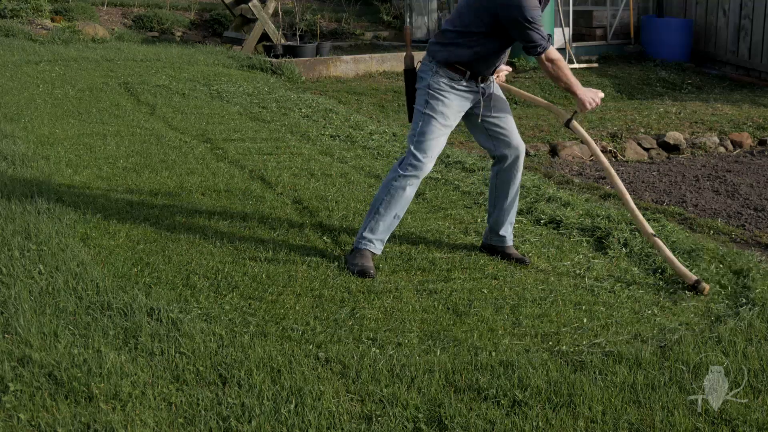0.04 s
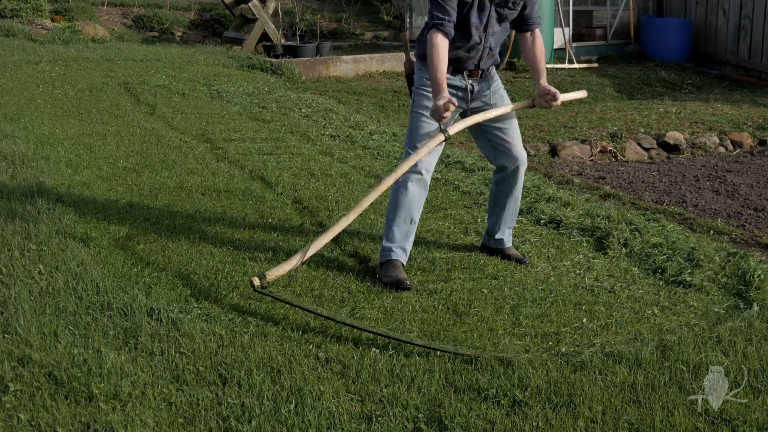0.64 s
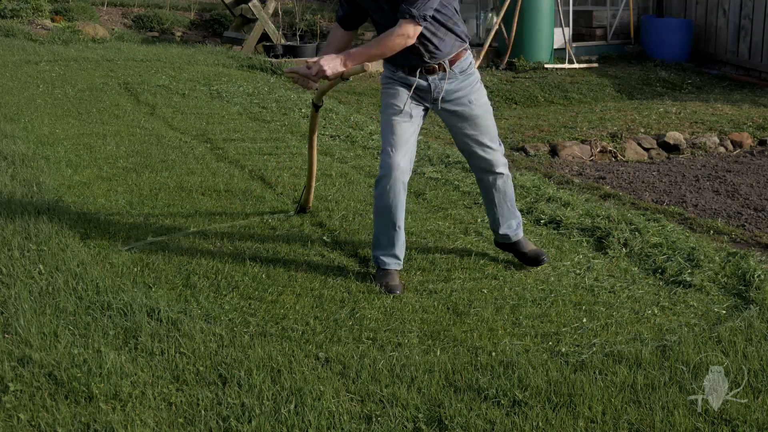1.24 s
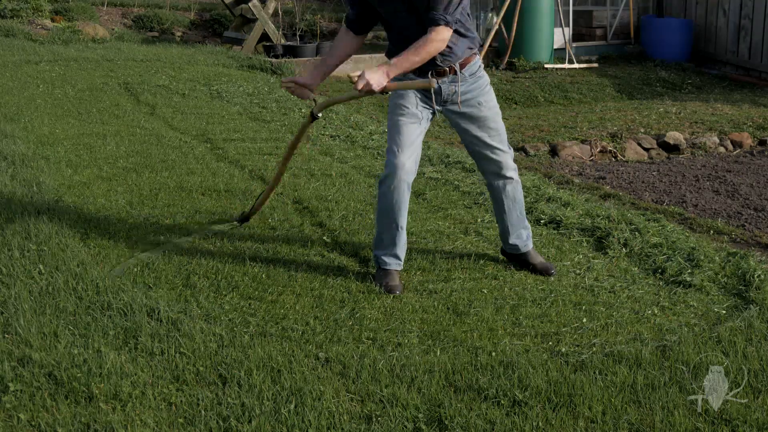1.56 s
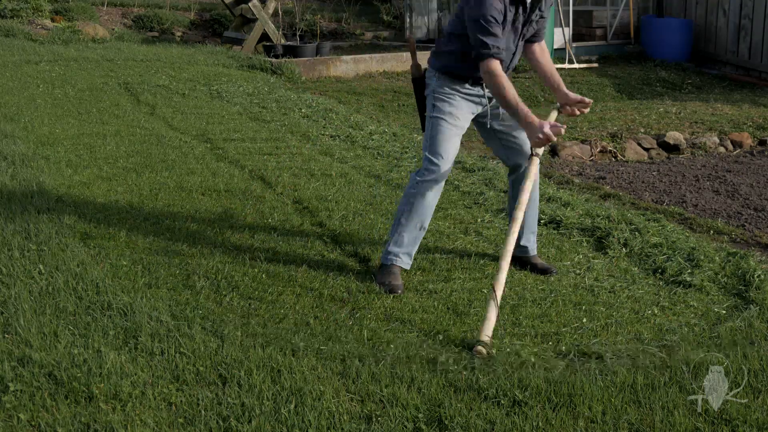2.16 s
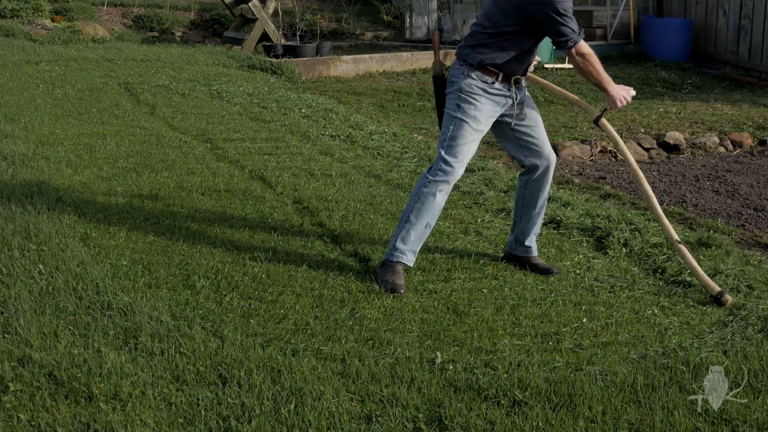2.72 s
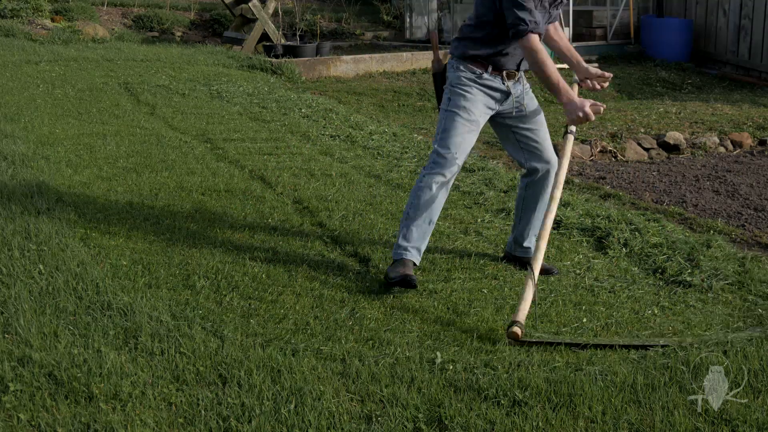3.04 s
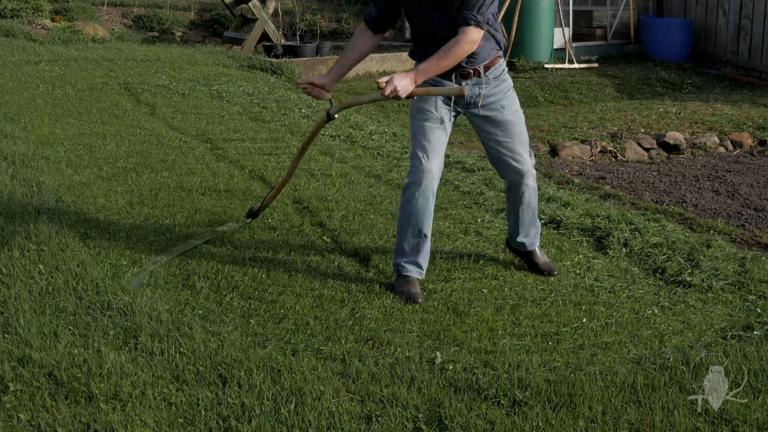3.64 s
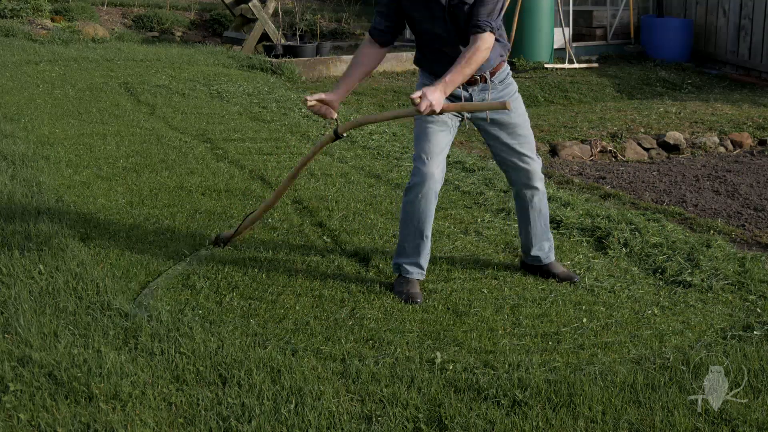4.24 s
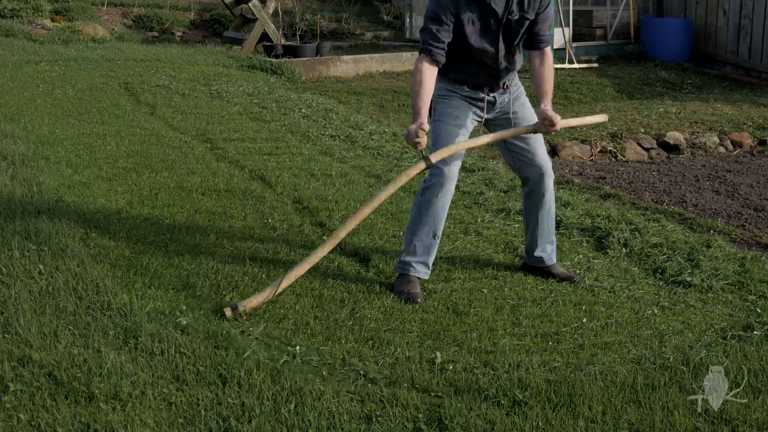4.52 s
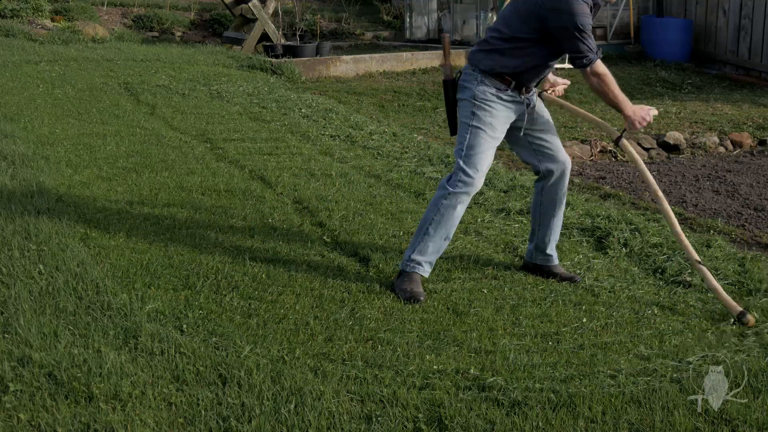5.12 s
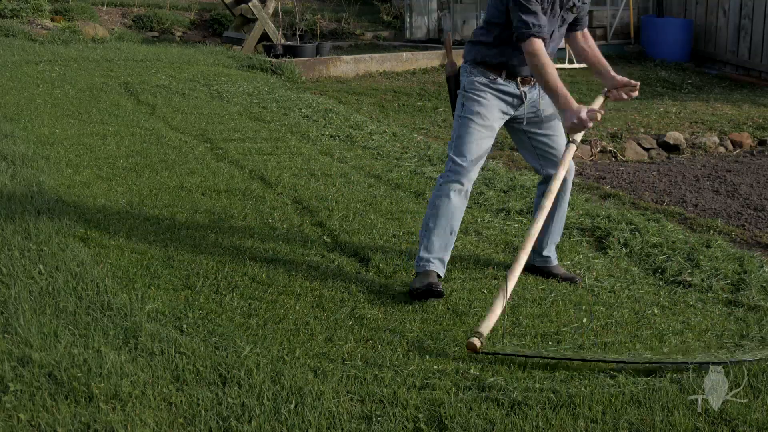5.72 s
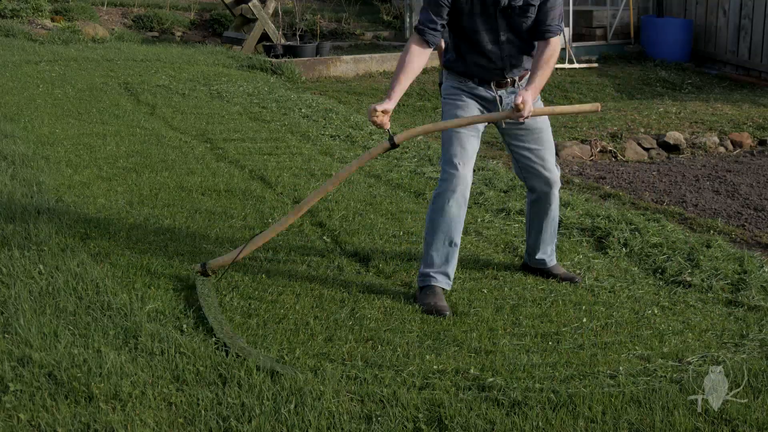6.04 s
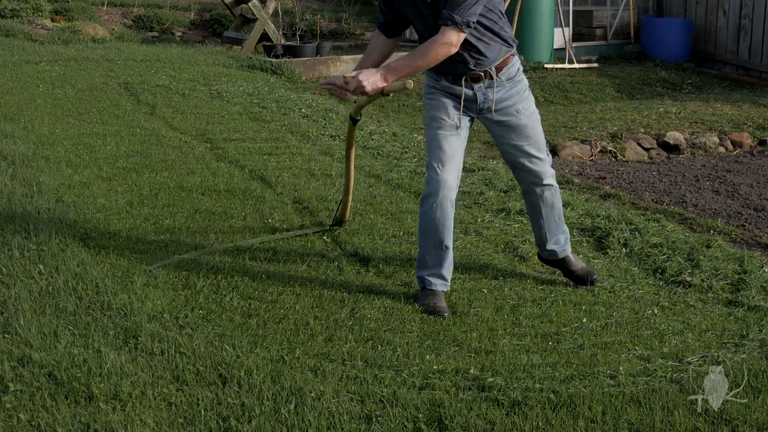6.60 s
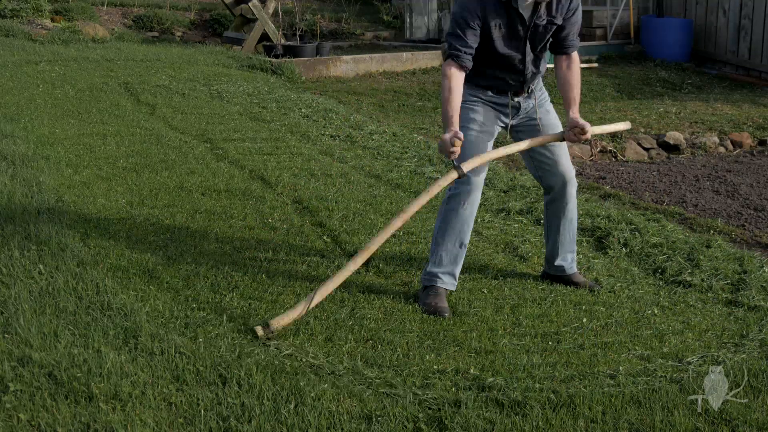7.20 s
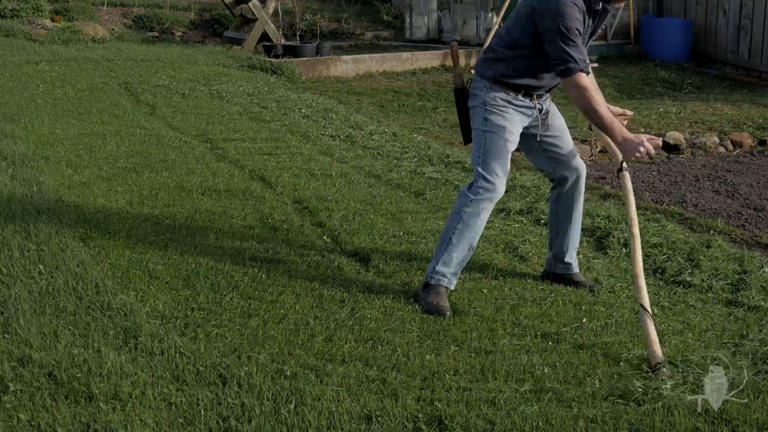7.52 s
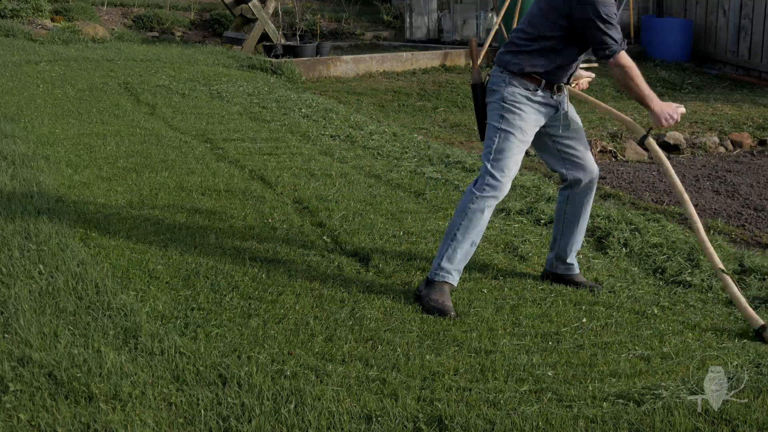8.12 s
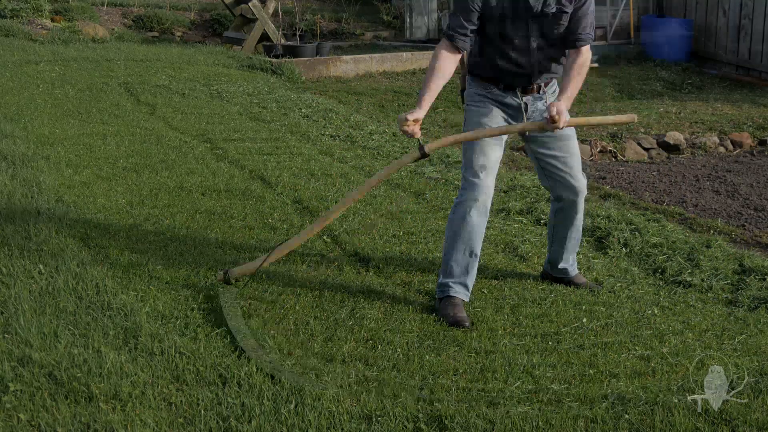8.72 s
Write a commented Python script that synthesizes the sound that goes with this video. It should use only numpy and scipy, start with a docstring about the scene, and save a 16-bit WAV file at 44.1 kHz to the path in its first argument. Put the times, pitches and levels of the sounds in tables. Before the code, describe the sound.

A scythe stroke fades out, then the thin steel blade mows three long strokes through grass, about two and a half seconds apart. Each swells into a crisp, faintly metallic swish and ends with a short scrape on the turf. Between them the blade skims softly back and boots shift faintly. The mowing is close, in a quiet garden with small birds chipping and whistling over a low hum of distant traffic.

```python
"""A scythe stroke dies away as small birds chip and whistle over a low hum of distant traffic.
The blade skims back over the stubble, then mows three long strokes, near 2.3, 4.8 and 7.5 seconds.
In each, the edge snaps thousands of stems, whose impulses excite the modes of the thin steel;
as the swing ends the blade's back scrapes the turf, and then it skims back again.
The birds and the traffic carry on to the end."""
import sys
import numpy as np
from scipy import signal
from scipy.fft import rfft, irfft
from scipy.io import wavfile
from scipy.ndimage import map_coordinates

SR = 44100
rng = np.random.default_rng(int(sys.argv[2]) if len(sys.argv) > 2 else 0)


def transcribe(signal):
    """Save signal, clipped to [-1, 1], as a 16-bit WAV file at the path in sys.argv[1]."""
    frames = np.atleast_2d(signal).T
    limited = np.clip(frames, -1, 1)
    pcm = np.round(limited * 32767).astype(np.int16)
    wavfile.write(sys.argv[1], SR, pcm)


N = 386316
TIME = np.arange(N) / SR
HZ = np.maximum(np.arange(N // 2 + 1) * SR / N, 1)


# Spectrum of grass swept aside: frequency_hz, gain_db
SWEEP_SPECTRUM = [(240, -13.5), (330, -4), (420, -2), (560, 0), (720, -3), (1080, -7), (1200, -11.5)]
# Spectrum of the blade's back scraping the turf: frequency_hz, gain_db
SCRAPE_SPECTRUM = [(700, -0.5), (1100, 4.5), (1350, -5.5), (1750, 1.5), (2200, -3), (2750, -9), (3800, -9),
                   (4400, -7.5), (5900, -6.5), (7500, -12)]
# Spectrum of the edge biting the stems: frequency_hz, gain_db
BITE_SPECTRUM = [(1600, 0.5), (1800, 0), (2700, 0.5), (3400, 1.5), (4300, 7), (5400, 1), (6500, -5.5),
                 (8000, -19.5)]
# Spectrum of the stems crackling: frequency_hz, gain_db
CRACKLE_SPECTRUM = [(7000, -3), (8000, -7), (9300, -6.5), (10500, -3), (12000, -2.5), (14000, -0.5),
                    (15100, -1.5), (15800, -4)]

def mowing():
    """Source and filter: trains of snaps are shaped into sweep, scrape, bite and crackle."""
    sweep, scrape, bite, crackle = swings()
    stems = snaps(per_s=15000, spread_db=2.0, clump_db=1.0)
    turf = snaps(per_s=8000, spread_db=3.0, clump_db=0.9)
    leaves = snaps(per_s=6000, spread_db=2.0, clump_db=-0.1)
    out = sweep * coloured(leaves, SWEEP_SPECTRUM)
    pressure = from_db(0.92 * drift(19.0))  # bumps in the lawn make the back press unevenly
    out += scrape * pressure * coloured(blade(turf, rubbed=True), SCRAPE_SPECTRUM)
    out += bite * ground_reflection(coloured(blade(stems, rubbed=False), BITE_SPECTRUM))
    # the stems' bright crackle, with a fixed dip near 8-9 kHz
    out += crackle * coloured(stems, CRACKLE_SPECTRUM)
    return out * from_db(0.73 * drift(12.0))


def snaps(per_s, spread_db, clump_db):
    """Shot noise: stems give way at random, unequal in size and bunched in tufts."""
    breaks = rng.random(N) < per_s / SR
    sizes = from_db(spread_db * np.minimum(rng.exponential(1, N), 4))
    signs = rng.choice([-1, 1], N)
    tufts = from_db(clump_db * drift(47))
    return rms_one(breaks * sizes * signs * tufts)


# Modes of the steel blade: frequency_hz, bandwidth_hz, cutting_gain_db, rubbing_gain_db
BLADE_MODES = [(1430, 70, 6, 9.5), (1665, 70, -8, -7), (1810, 60, -1, -14), (2035, 58, 2, -13),
               (2325, 55, 1, -10), (2550, 50, 0, -12), (2855, 45, -1, -14), (3068, 52, 3, -7),
               (3285, 85, 3, -7), (3520, 50, -4, -10), (3850, 110, -12, -6), (5200, 70, -6, -15),
               (6940, 50, -6, -12)]

def blade(x, rubbed):
    """Modal resonance of thin steel: the edge excites the high modes, the back mainly the lowest."""
    response = 1
    for hz, width_hz, cut_db, rub_db in BLADE_MODES:
        detuning = (HZ ** 2 - hz ** 2) / (HZ * width_hz)
        response = response + from_db(rub_db if rubbed else cut_db) / (1 + 1j * detuning)
    return irfft(rfft(x) * response, N)


# Cutting strokes: enter_s, end_s, force_db, extra_scrape_db, extra_crackle_db, abruptness_ratio
STROKES = [(-0.47, -0.105, -3.5, 1.5, -0.5, 1.0), (2.253, 2.465, -1.5, -0.7, 0.5, 0.74),
           (4.81, 5.128, 0, 1.5, 0.2, 0.91), (7.463, 7.769, 0.08, -0.5, 0.5, 1)]
# Envelope of each part of a cut: base_db, rise_db_per_s, fall_db_per_s
SWEEP_SWELL, SCRAPE_SWELL = (-38, 31.6, 60), (-30, 115, 79.5)
BITE_SWELL, CRACKLE_SWELL = (-31, 85, 55), (-36, 103, 103)

def cutting_power(swath_gathers_s=0.087, bite_eases_s=0.12, back_presses_s=0.045):
    """Power envelopes of the cuts: the swath gathers, the edge runs out of grass, the back presses."""
    power = np.zeros((4, N))
    for enter, end, force_db, scrape_db, crackle_db, abruptness in STROKES:
        parts = [(enter + swath_gathers_s, end, 0, 1, SWEEP_SWELL),
                 (end - back_presses_s, end, scrape_db, 1, SCRAPE_SWELL),
                 (enter, end - bite_eases_s, 0, abruptness, BITE_SWELL),
                 (enter, end, crackle_db, np.sqrt(abruptness), CRACKLE_SWELL)]
        for k, (full_from, full_to, extra_db, rise_ratio, (db, rise, fall)) in enumerate(parts):
            envelope = swell(full_from, full_to, rise_ratio * rise, fall)
            power[k] += (from_db(db + force_db + extra_db) * envelope) ** 2
    return power


# Back swings over the stubble: start_s, end_s, hiss_db, touchdown_db
BACK_SWINGS = [(0.437, 0.503, -49.5, -43), (2.98, 3.176, -47.5, -40.5), (5.59, 5.693, -50.5, -46.5),
               (8.334, 8.572, -45, -41.5)]
# The blade brushing the grass as it is lifted and turned: start_s, end_s, level_db
TURNS = [(0.755, 0.78, -66), (1.045, 1.188, -62.5), (3.627, 3.738, -60), (5.79, 5.808, -60),
         (6.247, 6.387, -61.5)]
# Light contacts: rise_db_per_s, fall_db_per_s, [sweep_db, scrape_db, bite_db, crackle_db]
RUN_UP, SHED = (36.6, 92, [-52.5, -54, -47.5, -50.5]), (37, 110, [-58, -40.5, -64, -46.5])
SKIM, BRUSH = (53, 80, [-5.5, -13, 0, 0.5]), (90, 59, [-2.5, -4.5, 4, 3])

def swings(run_up_s=0.33, shed_after_s=0.15, still_after_s=0.29, still_width_s=0.034, still_db=-3.5):
    """Incoherent sources add in power: all contacts sum to gains of sweep, scrape, bite and crackle."""
    power = cutting_power()
    still = np.zeros(N)
    for enter, end, *_ in STROKES:
        power += contact_power(enter - run_up_s, enter, RUN_UP)
        power += contact_power(end + shed_after_s, end + shed_after_s, SHED)
        # at the far end of the swing the blade stands still for a moment
        still += np.exp(-((TIME - end - still_after_s) / still_width_s) ** 2)
    for start, end, hiss_db, touchdown_db in BACK_SWINGS:
        power += contact_power(start, end, SKIM, hiss_db)
        touchdown = from_db(touchdown_db) * swell(start, start, rise_db_per_s=58, fall_db_per_s=91)
        power[1] += touchdown ** 2  # scrape only
    for start, end, db in TURNS:
        power += contact_power(start, end, BRUSH, db)
    return np.sqrt(power) * from_db(still_db * still)


def contact_power(start, end, kind, db=0):
    """Light friction on grass: sweep, scrape, bite and crackle share one power envelope."""
    rise, fall, mix_db = kind
    return (from_db(db) * from_db(mix_db)[:, None] * swell(start, end, rise, fall)) ** 2


def ground_reflection(x, echo_db=-8, notch_hz=1423, climb_hz=400, lead_s=0.029, rise_s=0.18, fall_s=0.37):
    """Comb filtering: the lawn's echo notches a pitch and its odd multiples, climbing with the swing."""
    swung = sum(np.interp(TIME - end + lead_s, [-rise_s, 0, fall_s], [0, 1, 0]) for _, end, *_ in STROKES)
    half_period = SR / (2 * (notch_hz + climb_hz * swung))
    echo = map_coordinates(x, [np.arange(N) - half_period], order=3)
    return rms_one(x + from_db(echo_db) * echo)


# Tough stalks and grit hitting the blade: start_s, level_db
GRIT_HITS = [(0.4294, -51), (0.771, -53), (3.0174, -49), (5.0304, -40), (7.886, -33.5), (8.3424, -48)]

def ticks():
    """Impact excitation: small hard hits set the blade's modes ringing."""
    spectrum_hz_db = [(700, -1), (1500, 2), (4000, 6), (12000, -43)]
    return blade(knocks(GRIT_HITS, spectrum_hz_db, decay_s=0.0089), rubbed=True)


# Boots shifting on the lawn: start_s, level_db
FOOTFALLS = [(0.768, -47), (1.498, -44), (4.107, -41), (5.969, -45), (6.79, -46)]

def steps():
    """Damped impact: boots on soft turf give short, low crunches."""
    spectrum_hz_db = [(250, -3), (500, 5), (1000, -8)]
    return knocks(FOOTFALLS, spectrum_hz_db, decay_s=0.029)


def knocks(hits, spectrum, decay_s):
    """Exponential decay: each contact is a burst of noise that starts fast and dies away."""
    envelope = np.zeros(N)
    for start, db in hits:
        age = np.maximum(TIME - start, 0) / decay_s
        envelope += from_db(db) * np.minimum(age * 10, 1) * np.exp(-age)
    return envelope * coloured(rng.standard_normal(N), spectrum)


def birds():
    """Distance raises the share of scattered sound: chips are near, calls and chatter farther off."""
    near = garden(chips(), t60_s=0.068, scatter_db=-7.5)
    far = garden(calls(), t60_s=0.8, scatter_db=-4.5)
    among_trees = garden(chatter(), t60_s=0.28, scatter_db=-3)
    return near + far + among_trees


# A small bird's runs of chips: first_s, last_s, chip_count, first_db, last_db
CHIP_SERIES = [(0.023, 0.173, 3, -43.5, -41.5), (0.226, 0.29, 2, -43, -47), (1.164, 1.36, 2, -52, -49.5),
               (1.487, 1.564, 2, -39.5, -39.5), (1.793, 2.053, 5, -43, -40), (2.566, 2.639, 2, -39, -38),
               (2.734, 2.999, 4, -41.5, -43), (3.363, 3.557, 4, -50.5, -57), (3.615, 3.789, 4, -44.5, -48),
               (3.864, 4.004, 3, -42.5, -44.5), (4.111, 4.241, 3, -44.5, -41.5),
               (4.316, 4.416, 2, -43.5, -44.5), (5.212, 5.431, 4, -44.5, -39.5),
               (5.529, 5.591, 2, -44, -43), (5.736, 5.962, 4, -41.5, -43.5), (6.093, 6.125, 2, -45, -45),
               (6.175, 6.303, 3, -45.5, -44), (6.941, 7.132, 4, -43.5, -38.5),
               (7.91, 8.156, 4, -38.5, -48.5)]

def chips(pitch_hz=4250, pitch_spread=0.0153, length_s=0.024, length_spread_s=0.002):
    """Periodic repetition with jitter: evenly spaced falling notes vary a little in pitch and length."""
    out = np.zeros(N)
    for first, last, count, first_db, last_db in CHIP_SERIES:
        for start, db in np.linspace((first, first_db), (last, last_db), count):
            longer, higher = rng.standard_normal(2)
            hz = pitch_hz * (1 + pitch_spread * higher)
            length = length_s + length_spread_s * longer
            add(out, start, db, note(length, hz, glide=0.76, curve=0.99, waver=0.018))
    return out


# Nearly level whistles: start_s, length_s, pitch_hz, level_db
WHISTLE_NOTES = [(0.521, 0.081, 3620, -45), (0.624, 0.059, 3620, -52), (3.634, 0.08, 3600, -51),
                 (4.12, 0.12, 4980, -48.5), (7.168, 0.05, 3600, -47), (7.172, 0.042, 4290, -43.5),
                 (8.489, 0.11, 3470, -47), (8.596, 0.062, 5700, -48)]
# Short rising notes: start_s, pitch_hz, level_db
RISING_NOTES = [(0.505, 3060, -44), (0.734, 3070, -50.5), (0.808, 4000, -51), (3.928, 3890, -49)]
# Soft low notes of a far bird: start_s, pitch_hz, level_db
SOFT_NOTES = [(0.24, 2860, -45.5), (0.99, 2060, -55), (3.505, 2400, -56), (6.272, 1920, -52),
              (6.353, 2340, -53), (6.975, 2400, -52)]
# Two-part chirps, a gentle fall and then a steep, weaker flick: start_s, pitch_hz, level_db
DOUBLE_CHIRPS = [(0.65, 2620, -49.5), (3.318, 2890, -51), (3.66, 2530, -46.5), (6.069, 2754, -37.5),
                 (6.128, 2714, -40), (6.532, 2800, -51), (6.672, 2470, -51), (6.838, 2860, -43)]
# Hoarse downward slurs: start_s, length_s, start_hz, end_hz, level_db
HOARSE_SLURS = [(0.862, 0.13, 5400, 2776, -56), (1.424, .125, 5710, 2205, -50)]

def calls(rise_s=0.026, soft_s=0.0325, chirp_s=0.026, flick_s=0.0208, smear_s=0.029):
    """Modulation sets timbre: a steady pitch gives a pure whistle, a wavering one a hoarser call."""
    out = np.zeros(N)
    for start, length, hz, db in WHISTLE_NOTES:
        add(out, start, db, note(length, hz, glide=0.97, curve=0.89, waver=0.0093))
    out *= from_db(3.5 * drift(30))  # the whistles flutter in level
    for start, hz, db in RISING_NOTES:
        add(out, start, db, note(rise_s, hz, glide=1.19, curve=0.9, waver=0.016))
    for start, hz, db in SOFT_NOTES:
        add(out, start, db, note(soft_s, hz, glide=0.86, curve=1.0, waver=0.022))
    for start, hz, db in DOUBLE_CHIRPS:
        add(out, start, db, note(chirp_s, hz, glide=0.9, curve=0.93, waver=0.024))
        add(out, start + chirp_s, db - 5.5, note(flick_s, hz, glide=0.66, curve=0.96, waver=0.03))
    for start, length, start_hz, end_hz, db in HOARSE_SLURS:
        # late, weaker copies off the foliage smear the slur into a rasp
        for late in np.linspace(0, 1, 7):
            slur = note(length, start_hz, glide=end_hz / start_hz, curve=0.97, waver=0.027)
            add(out, start + smear_s * late, db - 8.5 * late, slur)
    return out


# Distant birds chattering together: start_s, end_s, notes_per_s, lowest_hz, highest_hz, level_db
CHATTER_BOUTS = [(0.076, 0.27, 40, 3650, 4050, -47.5), (3.55, 4.3, 36, 3600, 4500, -48),
                 (5.3, 6.05, 62, 3900, 4500, -47.5), (0.75, 2.0, 13, 5100, 5700, -56),
                 (3.3, 4.6, 17, 4900, 5300, -58), (5.75, 6.3, 33, 4700, 6400, -58),
                 (0.7, 8.6, 9.8, 2100, 2900, -56)]

def chatter(length_s=0.0211):
    """A random point process: short falling notes start at scattered times and pitches."""
    out = np.zeros(N)
    for start, end, per_s, low_hz, high_hz, db in CHATTER_BOUTS:
        for when, pitch, weak in rng.random((int(per_s * (end - start)), 3)):
            hz = low_hz + pitch * (high_hz - low_hz)
            tweet = note(length_s, hz, glide=0.88, curve=0.9, waver=0.025)
            add(out, start + when * (end - start), db - 1.9 * weak, tweet)
    return out


def note(length_s, start_hz, glide, curve, waver):
    """Frequency modulation: a sine slides to `glide` times its starting pitch, trembling on the way."""
    progress = np.linspace(0, 1, int(length_s * SR))
    wobble = np.interp(progress, np.linspace(0, 1, 20), rng.standard_normal(20))
    hz = start_hz * glide ** (progress ** curve) * (1 + waver * wobble)
    envelope = np.sqrt(np.abs(np.sin(np.pi * progress)))
    return envelope * np.sin(2 * np.pi * np.cumsum(hz) / SR)


# Reflections from walls and sheds: delay_s, gain_db
WALL_ECHOES = [(.019, -13), (.028, -8.5), (.052, -15), (.083, -19)]

def garden(x, t60_s, scatter_db):
    """Convolution with an impulse response: direct sound, wall echoes and scatter from trees."""
    t = TIME[:SR]
    response = rng.standard_normal(SR) * from_db(-60 * t / t60_s) * np.minimum(t / 0.0067, 1)
    response *= from_db(scatter_db) / np.sqrt(np.sum(response ** 2))
    response[0] = 1
    for delay, db in WALL_ECHOES:
        response[int(delay * SR)] += from_db(db)
    return signal.fftconvolve(x, response)[:N]


# Spectrum of distant traffic: frequency_hz, gain_db
TRAFFIC_SPECTRUM = [(22, -29), (31, -25), (44, 0), (62, 1.5), (78, -2), (92, -3), (123, -6.5), (142, -12.5),
                    (170, -13.5), (215, -36)]

def traffic(rumble_db=-48.5, engine_hz=62.4, engine_db=-49.5):
    """Harmonics over noise: an engine's wavering fundamental and octave ride on a low rumble."""
    rumble = from_db(rumble_db) * coloured(rng.standard_normal(N), TRAFFIC_SPECTRUM)
    phase = 2 * np.pi * np.cumsum(engine_hz + 1.235 * drift(3.15)) / SR
    harmonics = np.sin(phase) + from_db(-8.5) * np.sin(2 * phase)
    return rumble + from_db(engine_db + 1.2 * drift(2.2)) * harmonics


# Spectrum of the garden's still air: frequency_hz, gain_db
AIR_SPECTRUM = [(230, -3.5), (334, 0), (668, -1), (980, -4.5), (1340, -12), (2500, -19), (3900, -15.5),
                (5500, -26), (8300, -27.5), (14700, -49), (15800, -35)]

def air(level_db=-51.5):
    """Stationary broadband noise: a soft, even hush."""
    return from_db(level_db) * coloured(rng.standard_normal(N), AIR_SPECTRUM)


def from_db(db):
    """Amplitude grows tenfold every 20 decibels."""
    return 10 ** (np.asarray(db) / 20)


def rms_one(x):
    """Normalisation to unit rms."""
    return x / np.sqrt(np.mean(x ** 2) + 1e-20)


def drift(rate_hz):
    """Low-pass noise of unit rms: a slow random fluctuation."""
    return rms_one(irfft(rfft(rng.standard_normal(N)) / (1 + (HZ / rate_hz) ** 2), N))


def coloured(x, spectrum):
    """Spectral shaping, with steep skirts past the ends of the curve; unit rms."""
    hz, db = np.transpose(spectrum)
    gain = from_db(np.interp(np.log(HZ), np.log(hz), db))
    skirts = np.minimum(HZ / hz[0], 1) ** 4 * np.minimum(hz[-1] / HZ, 1) ** 4
    return rms_one(irfft(rfft(x) * gain * skirts, N))


def swell(start, end, rise_db_per_s, fall_db_per_s):
    """Exponential growth up to `start`, a hold at 1, and exponential decay after `end`."""
    early_s, late_s = np.maximum(start - TIME, 0), np.maximum(TIME - end, 0)
    return from_db(-rise_db_per_s * early_s - fall_db_per_s * late_s)


def add(out, start_s, db, sound):
    """Linear mixing of a short sound at its time and level."""
    i = max(int(start_s * SR), 0)
    out[i:i + len(sound)] += from_db(db) * sound[:N - i]


def scene():
    """Superposition: all sources sum at one point, heard alike in both ears."""
    mono = ticks() + steps() + mowing() + birds() + traffic() + air()
    return np.stack([mono, mono])


def record(dry, cutoff_hz=15800):
    """Low-pass filtering: the highest treble is cut steeply."""
    return irfft(rfft(dry) / np.sqrt(1 + (HZ / cutoff_hz) ** 400), N)


dry = scene()
out = record(dry)
transcribe(out)
```